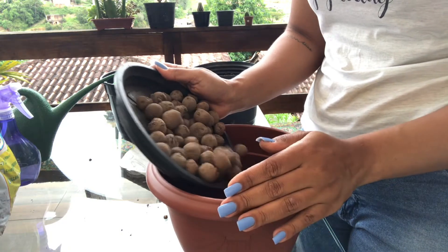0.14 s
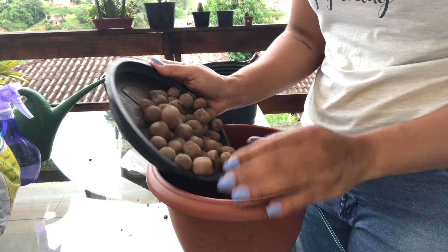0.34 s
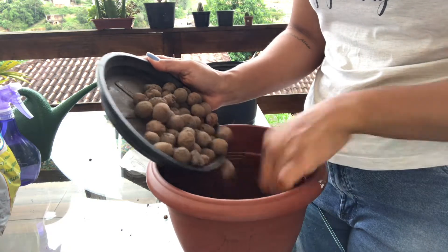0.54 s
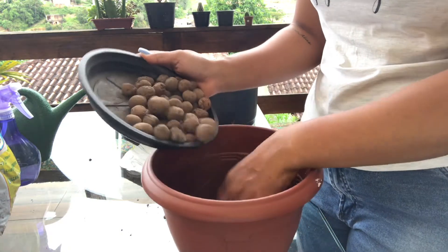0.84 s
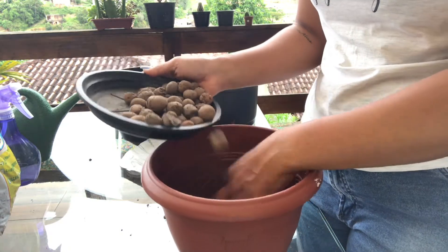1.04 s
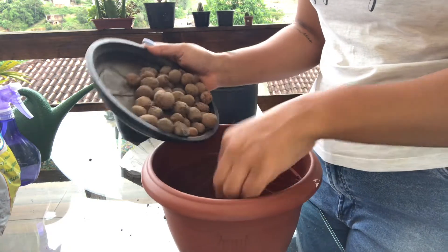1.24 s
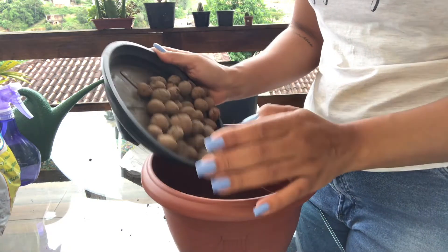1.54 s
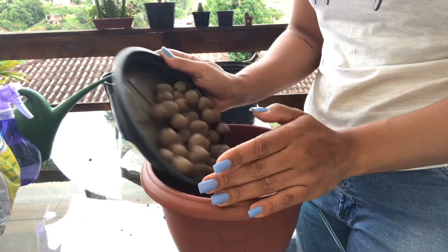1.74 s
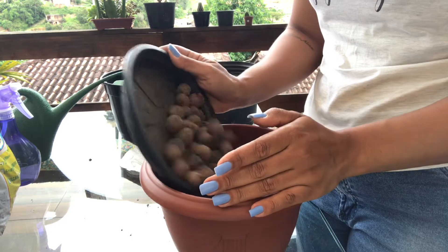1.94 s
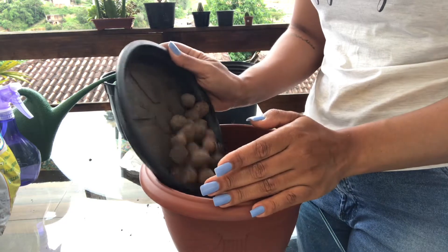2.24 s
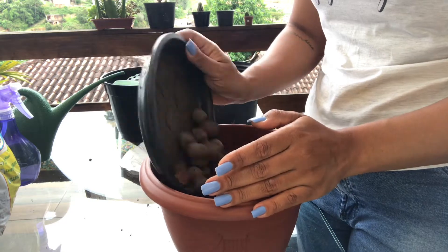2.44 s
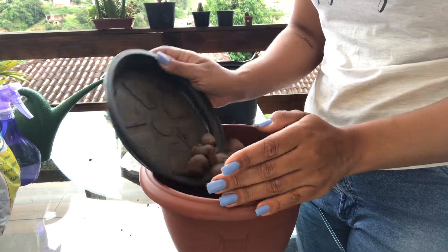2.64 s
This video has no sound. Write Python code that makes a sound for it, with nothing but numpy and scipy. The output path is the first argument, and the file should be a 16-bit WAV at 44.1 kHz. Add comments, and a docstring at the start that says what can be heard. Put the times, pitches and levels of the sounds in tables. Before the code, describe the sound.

Small hard clay pebbles pour with a dense rattling clatter into a hollow plastic pot, close up.

```python
"""Over a wavering outdoor drone and faint air, fired clay pebbles pour at once into a plastic pot, heard close.
Each landing thumps the pot's hollow modes, clacks its wall and ticks in noise-burst clay; knocks and grit fill in.
Near 0.7 s and 1.1 s the hand bumps the pot and rakes the pebbles; about 1.3 s the pour thins almost to a pause.
A dry rub on the rim bridges it, and near 1.65 s the landings return and run to the end.
Pot and porch reflect the pour as decaying noise tails; the loudest peaks are rounded off."""
import sys
import numpy as np
from scipy import signal
from scipy.fft import rfft, irfft
from scipy.io import wavfile

SR = 44100
rng = np.random.default_rng(int(sys.argv[2]) if len(sys.argv) > 2 else 0)


def persist_wave(psi):
    """Save psi, clipped to +-1, as 16-bit WAV."""
    counts = np.round(np.clip(psi, -1, 1) * 32767).astype(np.int16)
    wavfile.write(sys.argv[1], SR, np.atleast_2d(counts).T)


N = 123479  # length in samples

# Spectrum of the outdoor air. Each row: frequency in Hz, relative density in dB per Hz.
AIR_SPECTRUM = [(30, -27), (60, -12), (110, -10), (160, 6.5), (250, 1.5), (500, 0), (1000, -0.5),
                (3000, -6), (15500, -32)]
# The hand brushes the rim. Each row: time in seconds, level in dB.
BRUSH_LEVEL = [(1.43, -73), (1.455, -38.5), (1.56, -45), (1.65, -39), (1.68, -68)]
# The hand bumps the pot. Each row: start in seconds, level in dB before a doubling, t60 in seconds, pitch in Hz.
HAND_BUMPS = [(0.703, -21.5, 0.065, 237), (0.72, -27, 0.084, 215), (0.73, -25, 0.23, 79.5),
              (1.117, -26, 0.13, 71.6)]
# Rough clay skins rubbing. Each row: frequency in Hz, relative gain in dB.
GRIT_SPECTRUM = [(1100, -5), (2600, 0), (6400, -12), (10000, -27.5), (15500, -31)]
# The hand rakes through the pebbles. Each row: time in seconds, level in dB.
RAKE_LEVEL = [(.69, -65), (.7, -44), (.85, -46), (.95, -62), (1.07, -43), (1.16, -69)]
# Jostling of the loose pebbles. Each row: time in seconds, level in dB before the knock and grit trims.
JOSTLE_LEVEL = [(.012, -23.5), (.03, -33), (.11, -30.5), (.19, -20.5), (.225, -29), (.3, -26.5),
                (.39, -19.5), (.42, -30), (.45, -20), (.478, -30), (.525, -24.5), (.56, -33), (.62, -28),
                (.66, -38.5), (.69, -33), (.76, -21.5), (.83, -18), (.945, -27.5), (.97, -17), (1.0, -29.5),
                (1.04, -21), (1.125, -22.5), (1.16, -39), (1.2, -30.5), (1.35, -36.5), (1.43, -44.5),
                (1.47, -37.5), (1.62, -39.5), (1.765, -31), (1.81, -21), (1.88, -26), (2.12, -23),
                (2.17, -20.5), (2.335, -26.5), (2.37, -32.5), (2.41, -24.5), (2.46, -19.5), (2.52, -27.5),
                (2.6, -24), (2.7, -28), (2.75, -20.5), (2.8, -34)]
# Modes of the pot's hollow. Each row: frequency in Hz before detuning, relative level in dB, t60 in seconds.
HOLLOW_MODES = [(219.5, -19, 0.096), (298.6, -11, 0.066), (376.8, -3.5, 0.046), (423, -4, 0.071),
                (628, 1, 0.019), (754, -2, 0.024)]
# Modes of the pot's wall. Each row: frequency in Hz before detuning, relative level in dB, t60 in seconds.
WALL_MODES = [(1016.4, -3, 0.041), (1131, -2.5, 0.037), (1225, 4, 0.015), (1366, 0, 0.023),
              (1457.5, -5.5, 0.038), (1580, 2, 0.017), (1702, -7, 0.022), (1774, 1, 0.021),
              (1986, -6, 0.026), (2130, 3.5, 0.014), (2253, 3, 0.021), (2420, -1, 0.022),
              (2837, 15.5, 0.0049)]
# Tick of clay on clay. Each row: frequency in Hz, relative gain in dB.
CLAY_SPECTRUM = [(1500, -12), (2300, 4.5), (2900, 1), (4300, -0.5), (5000, -6), (5700, -2), (6600, -4),
                 (7400, -8.5), (8700, -15.5), (10300, -26.5), (15500, -32.5)]
# Pebbles landing. Each row: start in seconds, thump, clack and tick levels in dB before the landing trims,
# clack centre in Hz, tick centre in Hz.
POT_LANDINGS = [(0.0508, -19.5, -13.5, -17.5, 1950, 3190), (0.0798, -16.5, -9.5, -12.5, 1900, 4020),
                (0.0984, -16.5, -10, -21, 1880, 2960), (0.1046, -13, -2, -12, 1810, 4280),
                (0.1274, -21, -7.5, -18, 1600, 3070), (0.139, -32, -8.5, -35, 1600, 3740),
                (0.1513, -19.5, -15, -16, 1790, 4300), (0.1568, -31, -3.5, -17, 1630, 3300),
                (0.172, -14, -11.5, -25, 1890, 3870), (0.1757, -22, -7, -19, 1590, 4120),
                (0.1869, -24, -6, -21, 1650, 3350), (0.1904, -28, -8, -15, 1280, 4170),
                (0.2026, -35, -11, -31, 1700, 3880), (0.239, -14.5, -9, -22, 1340, 3030),
                (0.2833, -26, -10.5, -17.5, 1510, 4000), (0.332, -12.5, -9, -13, 2080, 4290),
                (0.3734, -18, -6.5, -16.5, 1610, 3250), (0.3777, -18.5, -5, -26, 2000, 3970),
                (0.3836, -19, -5, -15.5, 1740, 3940), (0.4366, -17, -11.5, -11, 1880, 4350),
                (0.4475, -34, -6.5, -19, 1490, 4030), (0.49, -20, -6.5, -15.5, 1690, 4800),
                (0.5026, -20, -9, -9.5, 1490, 4150), (0.5793, -20, -22, -13, 2200, 4900),
                (0.5875, -34, -8, -18, 1670, 4100), (0.6051, -18, -8.5, -14, 1530, 3370),
                (0.6345, -25.5, -15, -26, 1890, 3700), (0.6706, -29, -23, -31, 1750, 3900),
                (0.7001, -24, -16.5, -17, 2050, 10600), (0.7239, -19.5, -9.5, -20, 1710, 3370),
                (0.7336, -13.5, -7, -19, 1680, 3800), (0.7637, -20, -9, -17.5, 1830, 4640),
                (0.775, -17, -5, -15, 1730, 4060), (0.7946, -17.5, -9, -18.5, 1380, 4000),
                (0.8884, -19, -8, -20, 1880, 3000), (0.9029, -18.5, -13, -20, 1520, 3270),
                (0.93, -24, -9, -21, 2000, 3600), (1.0145, -16.5, -14, -22.5, 1720, 3060),
                (1.057, -15, -10.5, -25, 1990, 4140), (1.0668, -16.5, -7, -15, 1720, 3100),
                (1.1021, -16.5, -12, -44, 1520, 3630), (1.116, -29, -11, -47, 1180, 3930),
                (1.135, -21, -3, -17.5, 1210, 11700), (1.182, -30, -19.5, -21.5, 1780, 4200),
                (1.215, -22.5, -11.5, -23.5, 1530, 2770), (1.2488, -22, -5.5, -14, 1740, 3460),
                (1.269, -37, -14.5, -45, 1210, 3220), (1.3056, -18.5, -12, -13.5, 1600, 3680),
                (1.333, -42, -22, -31.5, 1760, 3870), (1.4893, -52, -32, -25, 2150, 3560),
                (1.5544, -38, -21.5, -50, 1420, 2970), (1.592, -37, -29, -33.5, 2080, 2930),
                (1.646, -36, -11.5, -13, 2380, 4100), (1.6715, -23, -12.5, -22, 2330, 2940),
                (1.6753, -20.5, -8, -39, 2570, 2920), (1.6796, -26, -26, -16, 2290, 2890),
                (1.6923, -15, -5.5, -12.5, 1550, 4900), (1.6971, -22, -9, -27, 2040, 4120),
                (1.7277, -26, -14.5, -25, 1840, 3260), (1.7401, -26, -10, -21.5, 1630, 3860),
                (1.7794, -12, -8, -11, 1960, 3570), (1.816, -24, -7.5, -17, 1870, 2940),
                (1.822, -30, -15.5, -14.5, 1370, 3800), (1.8692, -37, -32, -17.5, 1720, 3850),
                (1.9051, -15.5, -5.5, -17, 1480, 4360), (1.938, -16.5, -7.5, -11.5, 2010, 4500),
                (1.9491, -10.5, -8, -17.5, 1680, 3670), (1.982, -21.5, -7.5, -12, 1960, 2930),
                (1.986, -25, -9, -16, 1500, 4440), (2.0188, -25, -10, -15, 1520, 5770),
                (2.04, -32, -7, -14.5, 1990, 4240), (2.094, -27, -11, -22, 1710, 5850),
                (2.1026, -21, -13, -18, 1730, 3470), (2.125, -18.5, -10.5, -14.5, 1650, 4100),
                (2.15, -23, -12.5, -16, 2110, 2870), (2.241, -33, -13.5, -21.5, 1520, 3470),
                (2.271, -18.5, -11, -27, 1690, 4200), (2.3133, -21.5, -10, -14.5, 1660, 3060),
                (2.3264, -31, -7, -17, 1880, 10800), (2.4202, -16.5, -7, -16.5, 1450, 4000),
                (2.4453, -44, -17, -18.5, 2200, 4230), (2.4863, -43, -11, -10.5, 1930, 3120),
                (2.4991, -30, -12.5, -19, 1600, 4800), (2.5405, -35, -10.5, -21, 1265, 3620),
                (2.5519, -19, -14.5, -16.5, 2100, 2940), (2.5904, -17, -7.5, -18, 1770, 3680),
                (2.594, -16, -9.5, -16.5, 1870, 4470), (2.6043, -17, -9, -14, 1240, 5630),
                (2.6188, -21, -7.5, -18, 2010, 2740), (2.6466, -15, -8, -14.5, 1730, 5270),
                (2.651, -36, -6.5, -20, 1530, 4120), (2.6727, -19, -11, -16.5, 1730, 4530),
                (2.715, -16.5, -7, -18, 1430, 3750), (2.7239, -34, -6.5, -16, 1880, 3700),
                (2.7409, -29, -5, -23, 1730, 3580), (2.7562, -16, -8.5, -18, 1560, 3500),
                (2.7913, -17, -14, -18, 1480, 3620)]

# background and reflections
DRONE_HZ, DRONE_WIDTH_HZ = 74, 11  # the width is the half-width at half amplitude
DRONE_DB, AIR_DB = -42, -42
POT_ECHO_DB, POT_ECHO_T60_S = -15.5, 0.045
PORCH_DB, PORCH_T60_S = -23.5, 0.33
# hand on the rim and in the pebbles; octave width of the rub is a Gaussian spread
BRUSH_HZ, BRUSH_OCTAVES, BRUSH_PER_S = 736, 0.23, 700
GRIT_DB, GRIT_PER_S, GRIT_SPREAD_DB = -9.5, 1200, 6.5  # level against the jostling, slip rate, scatter
RAKE_HISS_DB, RAKE_HISS_HZ = -15, 12200  # dry hiss against the raking grit
# one contact
HEAD_S, RING_S = .005, .09  # opening over which a hit's level is set; length of a ring
MODE_SCATTER, CLACK_OCTAVES = 0.023, 0.46  # detuning as a fraction; Gaussian width of a clack
CONTACT_S = 0.001  # time constant of the push
WALL_DB, PEBBLE_DB = 0.5, -3  # wall ring against pebble ring inside a clack
PEBBLE_T60_S, PEBBLE_SPLIT = 0.014, .12  # median decay; average split as a fraction of pitch
TICK_OCTAVES, TICK_FOCUS_DB = 0.35, 7.5  # boost around the pebble's own pitch
TICK_RISE_S, TICK_T60_S = 0.00037, 0.023
PING_DB, PING_T60_S = -9, 0.012  # pebble's pure ring against its crack, before the clay colour
# trims and scatter of the two kinds of contact
KNOCK_SPREAD_DB = 4.5
KNOCK_THUMP_DB, KNOCK_CLACK_DB, KNOCK_TICK_DB = -13.5, -2, -10.5
KNOCK_CLACK_HZ, KNOCK_TICK_HZ, KNOCK_OCTAVES = 1583, 3895, 0.3175  # middle pitches and their scatter
THUMP_DB, CLACK_DB, TICK_DB = -4, -2.5, 0
# finish
CEILING, KNEE = 0.95, 2.1  # amplitude that peaks bend towards; a higher knee bends more sharply
LOW_CUT_HZ, TOP_HZ = 46, 15900


def undb(db):
    """Decibels to gain."""
    return 10 ** (np.asarray(db) / 20)


def unit(x):
    """Scale to rms 1."""
    return x / np.sqrt(np.mean(x ** 2))


def colour(points, hz):
    """Gain drawn through (Hz, dB) points on a log-frequency axis."""
    f, db = np.array(points).T
    return undb(np.interp(np.log(hz + 1), np.log(f), db))


def bell(hz, centre_hz, octaves):
    """Gaussian band on an octave scale."""
    return np.exp(-.5 * (np.log2(hz / centre_hz) / octaves) ** 2)


def filtered(x, gain):
    """Shape a full-length signal by a gain per frequency bin, then scale to rms 1."""
    return unit(irfft(rfft(x) * gain, N))


def level(points):
    """Gain over the whole scene, drawn through (seconds, dB) points."""
    return undb(np.interp(np.arange(N) / SR, *np.array(points).T))


def fade(t, t60):
    """Exponential decay that loses 60 dB in t60."""
    return np.exp(-np.log(1000) * t / t60)


def rise(t, seconds):
    """Exponential onset with the given time constant."""
    return 1 - np.exp(-t / seconds)


def sized(rows, db):
    """Give each hit its rms level over the first milliseconds."""
    head_rms = np.sqrt(np.mean(rows[:, :int(HEAD_S * SR)] ** 2, axis=1))
    return rows * (undb(db) / head_rms)[:, None]


def place(times, rows):
    """Lay each row down at its time."""
    out = np.zeros(N + rows.shape[1])
    starts = np.clip(times * SR, 0, N - 1).astype(int)
    for start, row in zip(starts, rows):
        out[start:start + len(row)] += row
    return out[:N]


def outdoors():
    """Narrow-band noise wavers as a low drone; broad shaped noise makes the faint air."""
    hz = np.arange(N // 2 + 1) * SR / N
    resonance = 1 / (1 + ((hz - DRONE_HZ) / DRONE_WIDTH_HZ) ** 2)
    drone = filtered(rng.standard_normal(N), resonance)
    air = filtered(rng.standard_normal(N), colour(AIR_SPECTRUM, hz))
    return undb(DRONE_DB) * drone + undb(AIR_DB) * air


def echo(x, t60, wet_db):
    """Diffuse reflections, a noise tail that builds up and dies away."""
    t = np.arange(SR // 2) / SR
    tail = rng.standard_normal(len(t)) * fade(t, t60) * rise(t, 0.0085)
    tail /= np.sqrt(np.sum(tail ** 2))
    return undb(wet_db) * signal.fftconvolve(x, tail)[:N]


def brush():
    """Skin rubs the plastic rim in dry, uneven slips: sparse random clicks in a narrow band."""
    hz = np.arange(N // 2 + 1) * SR / N
    slips = rng.standard_normal(N) * (rng.random(N) < BRUSH_PER_S / SR)
    return filtered(slips, bell(hz + 1, BRUSH_HZ, BRUSH_OCTAVES)) * level(BRUSH_LEVEL)


def bumps():
    """The hand knocks softly inside the pot, each bump one low damped sine."""
    t = np.arange(N // 8) / SR
    times, db, t60, hz = np.array(HAND_BUMPS).T[:, :, None]
    knocks = 2 * undb(db) * fade(t, t60) * rise(t, 0.0032) * np.sin(2 * np.pi * hz * t)
    return place(times[:, 0], knocks)


def slips(gain):
    """Random tiny clicks of uneven size and either sign, coloured by the gain."""
    size = rng.choice([-1, 1], N) * undb(GRIT_SPREAD_DB * rng.standard_normal(N))
    return filtered(size * (rng.random(N) < GRIT_PER_S / SR), gain)


def grit():
    """Clay slips on clay in dense tiny clicks, following the jostling and the raking hand."""
    hz = np.arange(N // 2 + 1) * SR / N
    skin = colour(GRIT_SPECTRUM, hz)
    rolling = undb(GRIT_DB) * level(JOSTLE_LEVEL) * slips(skin)
    raked = slips(skin)
    hiss_band = np.exp(-10 * np.log2((hz + 1) / RAKE_HISS_HZ) ** 2)
    hiss = undb(RAKE_HISS_DB) * slips(hiss_band)
    return rolling + level(RAKE_LEVEL) * (raked + hiss)


def ring(modes, weights, count=8):
    """Damped modes, struck at a new spot each time and slightly detuned by the shifting load."""
    hz, db, t60 = np.array(modes).T
    t = np.arange(int(RING_S * SR)) / SR
    angle = 2 * np.pi * rng.random(weights.shape)
    size = weights * undb(db) * (.5 + rng.random(weights.shape))
    in_phase, quadrature = size * np.cos(angle), size * np.sin(angle)
    shape = fade(t, t60[:, None]) * rise(t, CONTACT_S)
    out = np.zeros((len(weights), len(t)))
    for k in range(count):  # every count-th hit shares one detuning
        detuned_hz = hz * (1 + MODE_SCATTER * rng.standard_normal(len(hz)))
        turn = 2 * np.pi * detuned_hz[:, None] * t
        out[k::count] = in_phase[k::count] @ (shape * np.sin(turn))
        out[k::count] += quadrature[k::count] @ (shape * np.cos(turn))
    return out


def pebbles(centre_hz):
    """A slightly oval pebble rings briefly in two close modes, each pebble with its own damping."""
    t = np.arange(int(RING_S * SR)) / SR
    split, damping, share = rng.random((len(centre_hz), 3)).T[:, :, None]
    turn = 2 * np.pi * centre_hz[:, None] * t
    apart = PEBBLE_SPLIT * 2 * split
    pair = np.sin(turn) + share * np.sin(turn * (1 + apart))
    t60 = PEBBLE_T60_S * 2 ** (damping - .5)
    return pair * fade(t, t60) * rise(t, CONTACT_S) ** 2


def tick(centre_hz, size=1024):
    """Porous clay cracks as a brief noise burst, and each pebble rings at its own pitch."""
    t = np.arange(size) / SR
    hz = np.arange(size // 2 + 1) * SR / size
    pitch = centre_hz[:, None]
    focus = undb(TICK_FOCUS_DB * bell(hz + 1, pitch, TICK_OCTAVES))
    noise = rng.standard_normal((len(centre_hz), size))
    crack = irfft(rfft(noise) * colour(CLAY_SPECTRUM, hz) * focus) * fade(t, TICK_T60_S)
    ping = np.sin(2 * np.pi * pitch * t) * fade(t, PING_T60_S)
    ping = sized(ping, PING_DB) * colour(CLAY_SPECTRUM, pitch)
    return (sized(crack, 0) + ping) * rise(t, TICK_RISE_S)


def strikes(times, thump_db, clack_db, tick_db, clack_hz, tick_hz):
    """Pebble contacts: the hollow thumps, pebble and wall clack, the clay ticks."""
    wall_hz = np.array(WALL_MODES)[:, 0]
    reach = bell(wall_hz, clack_hz[:, None], CLACK_OCTAVES)  # favours modes near the clack centre
    even = np.ones((len(times), len(HOLLOW_MODES)))
    thumps = sized(ring(HOLLOW_MODES, even), thump_db)
    wall = sized(ring(WALL_MODES, reach), WALL_DB)
    pebble = sized(pebbles(clack_hz), PEBBLE_DB)
    clacks = sized(wall + pebble, clack_db)
    ticks = sized(tick(tick_hz), tick_db)
    return place(times, thumps + clacks) + place(times, ticks)


def jostle(count=1000):
    """Pebbles roll, rebound and settle in many small knocks of scattered force and pitch."""
    times = (np.arange(count) + 2 * rng.random(count)) / count * N / SR
    force, body, bright, wall, pebble = rng.standard_normal((count, 5)).T
    db = np.interp(times, *np.array(JOSTLE_LEVEL).T)
    db = db + KNOCK_SPREAD_DB * np.minimum(force, 1.3)  # no knock sticks out far
    thump_db = db + KNOCK_THUMP_DB + 2 * body
    tick_db = db + KNOCK_TICK_DB + 3 * bright
    clack_hz = KNOCK_CLACK_HZ * 2 ** (KNOCK_OCTAVES * wall)
    tick_hz = KNOCK_TICK_HZ * 2 ** (KNOCK_OCTAVES * pebble)
    return strikes(times, thump_db, db + KNOCK_CLACK_DB, tick_db, clack_hz, tick_hz)


def landings():
    """Pebbles drop in, each a separate contact, faint click to hard hit, with its own thump, clack and tick."""
    times, thump_db, clack_db, tick_db, clack_hz, tick_hz = np.array(POT_LANDINGS, float).T
    return strikes(times, thump_db + THUMP_DB, clack_db + CLACK_DB, tick_db + TICK_DB, clack_hz, tick_hz)


def scene():
    """The pour, its reflections in the pot and the porch, and the background."""
    pour = landings() + jostle() + grit() + bumps() + brush()
    pot = echo(pour, POT_ECHO_T60_S, POT_ECHO_DB)
    porch = echo(pour, PORCH_T60_S, PORCH_DB)
    return (pour + pot + porch + outdoors())[None]


def record(dry):
    """The loudest peaks are rounded off, then the deep bass and the top are cut."""
    held = dry / (1 + np.abs(dry / CEILING) ** (2 * KNEE)) ** (.5 / KNEE)
    low_cut = signal.butter(2, LOW_CUT_HZ, "high", fs=SR, output="sos")
    top_cut = signal.ellip(10, .2, 70, TOP_HZ, fs=SR, output="sos")
    return signal.sosfilt(top_cut, signal.sosfilt(low_cut, held))


dry = scene()
out = record(dry)
persist_wave(out)
```